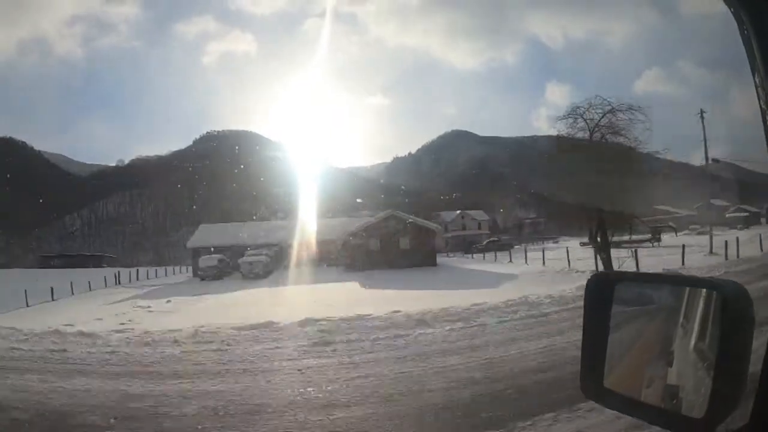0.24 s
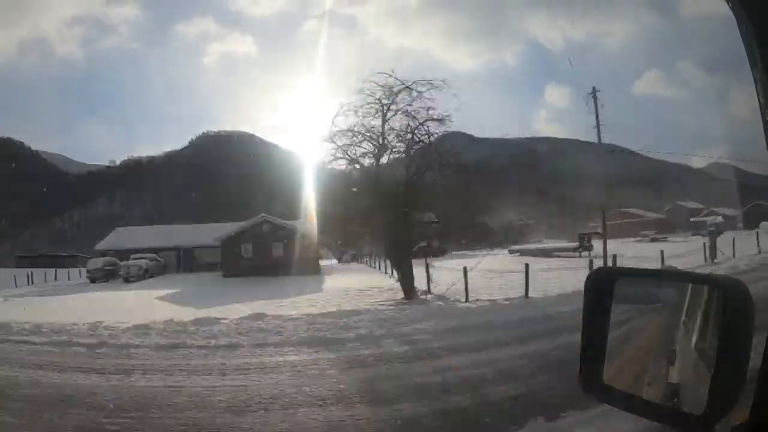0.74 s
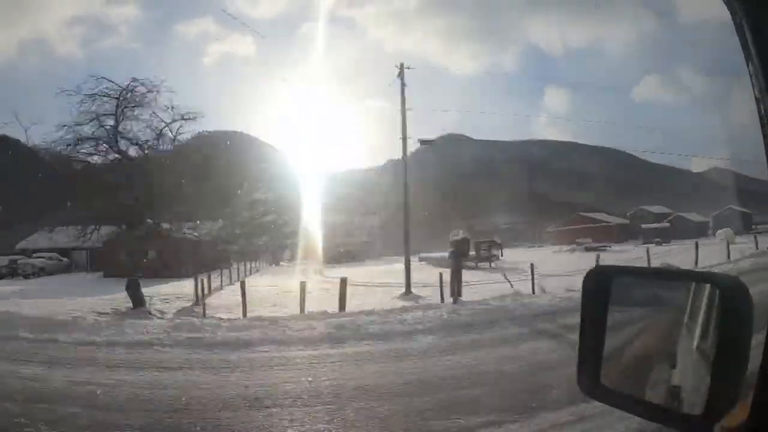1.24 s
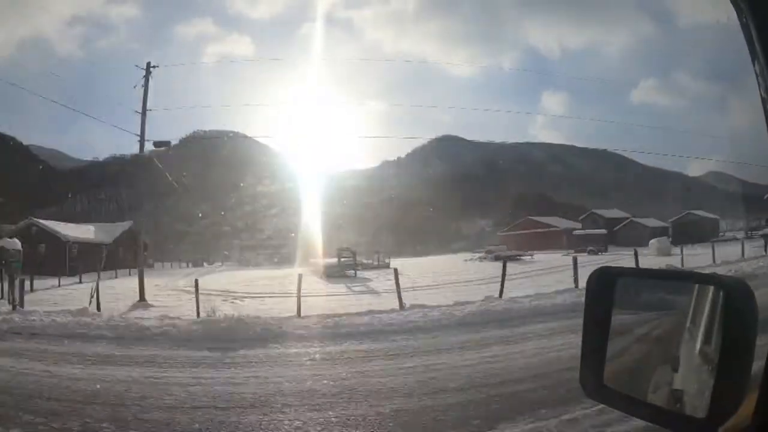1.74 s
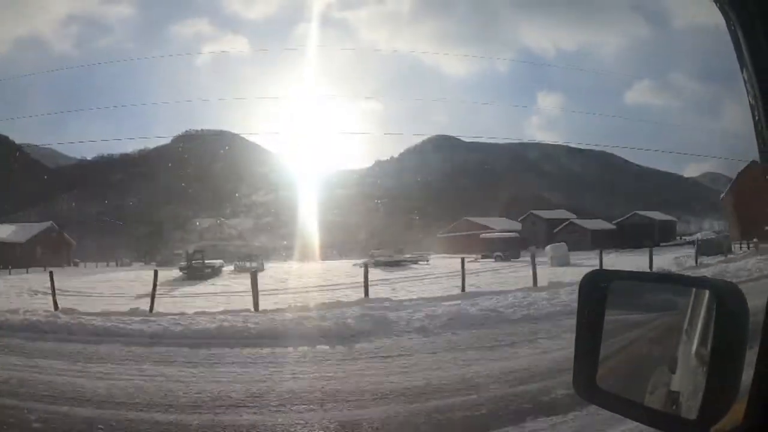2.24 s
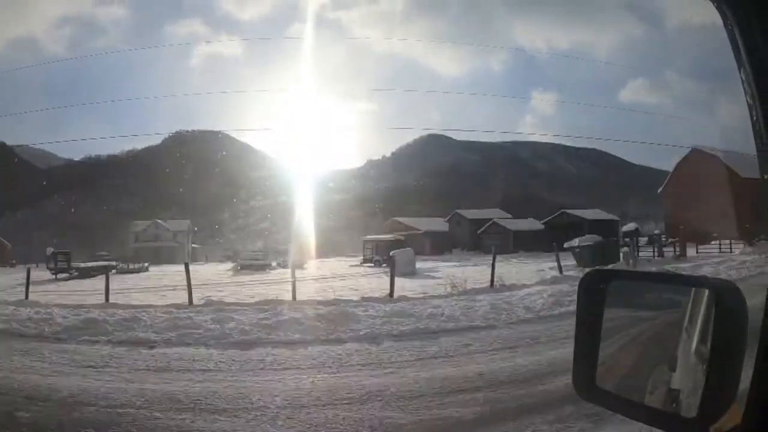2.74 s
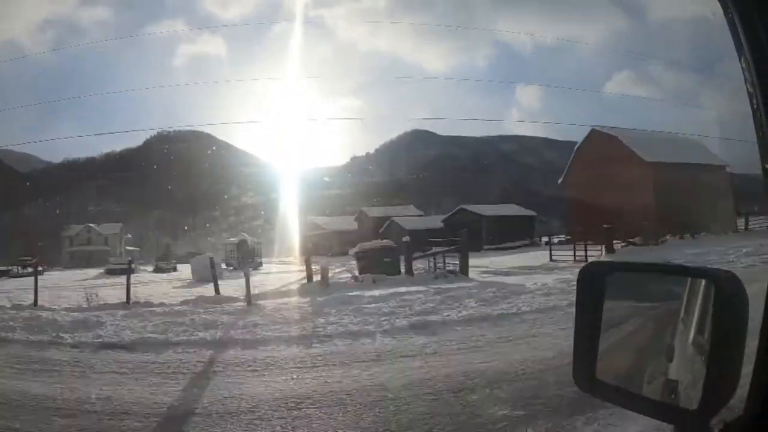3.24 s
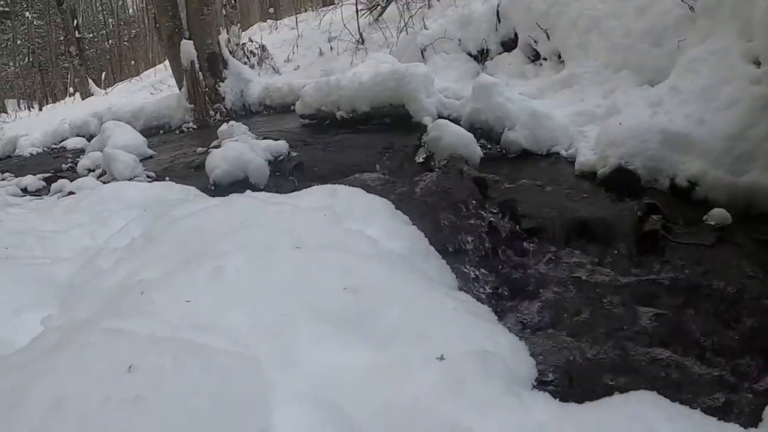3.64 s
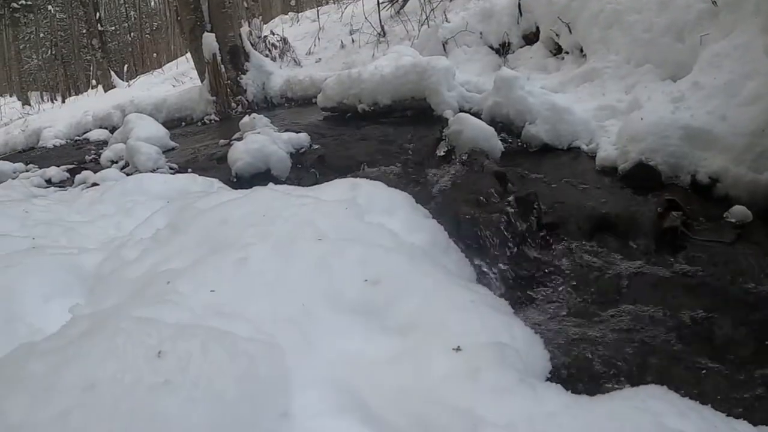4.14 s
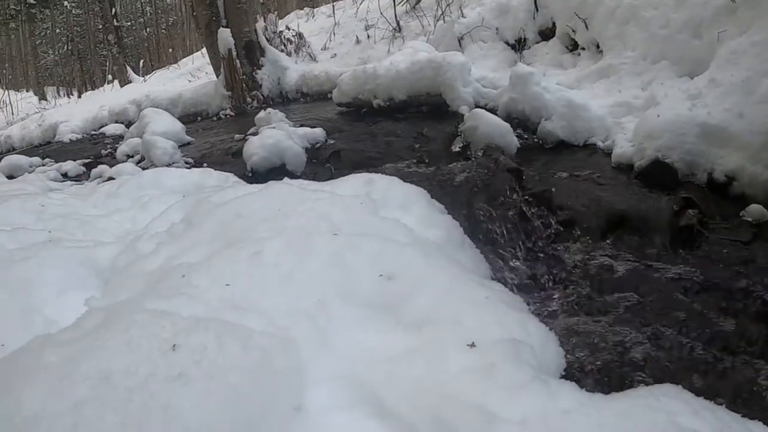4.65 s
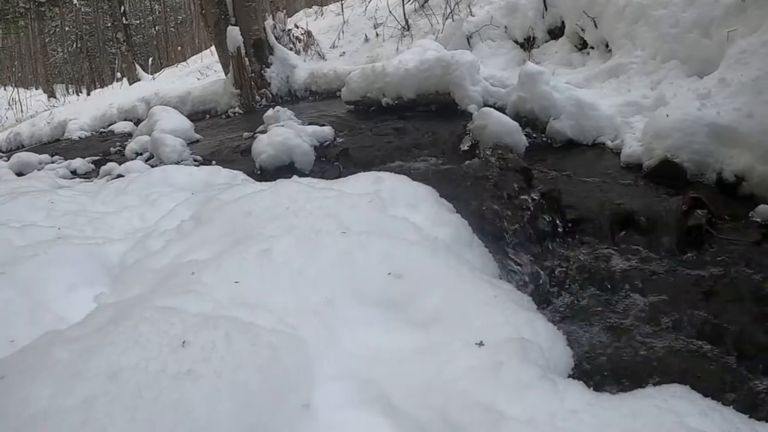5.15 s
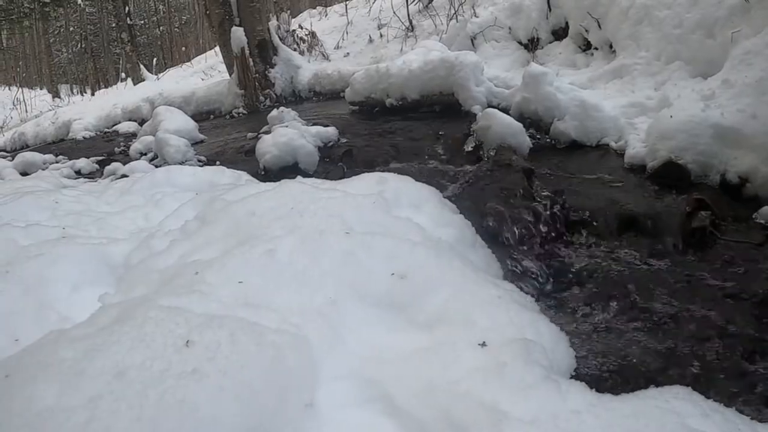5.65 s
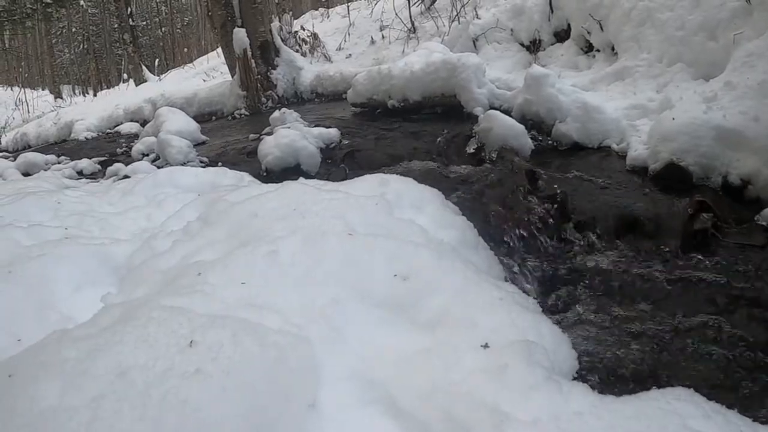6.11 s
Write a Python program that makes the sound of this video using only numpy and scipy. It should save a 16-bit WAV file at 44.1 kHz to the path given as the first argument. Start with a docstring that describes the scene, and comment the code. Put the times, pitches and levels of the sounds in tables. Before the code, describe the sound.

An off-road vehicle booms and hums along a snowy road, heard from inside, before giving way to a bubbling, rushing creek.

```python
"""Inside an off-road vehicle on a packed-snow road, then beside a small creek between snowbanks.
Bumps shake the body and the cabin air into a deep boom. The tyres roar and hum, slush hisses,
loose trim rattles and squeaks, and a few knock-like peaks stand out. A quick fade leads to the
creek rushing over rocks, a wash of noise full of ringing air bubbles. Another returns to the cabin."""
import sys
import numpy as np
from scipy import signal
from scipy.fft import rfft, irfft
from scipy.io import wavfile
from scipy.ndimage import uniform_filter1d

SR = 44100
rng = np.random.default_rng(int(sys.argv[2]) if len(sys.argv) > 2 else 0)


def generate_wav(signal):
    """Clip the signal to [-1, 1] and save it as 16-bit WAV at the path in sys.argv[1]."""
    frames = np.transpose(np.atleast_2d(signal))
    scaled = np.clip(frames, -1, 1) * 32767
    pcm = np.round(scaled).astype(np.int16)
    wavfile.write(sys.argv[1], SR, pcm)


N = 281269
T, HZ = np.arange(N) / SR, np.fft.rfftfreq(N, 1 / SR)
CREEK_START_S, CREEK_END_S = 3.343, 6.278

# Pitches that the cabin panels boost or weaken in roar and hiss: (pitch [Hz], width [Hz], gain [dB])
PANELS = [(128, 22, 2), (136.4, 8, -2.5), (149, 20, 1.5), (161, 11, -2.5), (195, 22, -0.5), (255, 26, 3),
          (340, 44, 5.5), (735, 100, 4.5), (833, 79, -8), (1960, 340, -3.5)]


def cabin():
    """Everything heard in the vehicle; boom, hum, knocks and squeaks reach both ears."""
    # How the two ears differ: (pitch [Hz], likeness [0-1], left lead [radians], left over right [dB])
    cabin_ears = [(30, .999, -.08, 1.5), (70, 1, -.06, .4), (146, .998, -.03, .2), (250, .99, -.11, .25),
                  (330, .98, -.14, -.5), (434, .9, -.11, -.3), (570, .92, -.01, 1.1), (750, .9, -.27, 2.3),
                  (1290, .75, -.3, 2.2), (1690, .73, -.6, 1.6), (2220, .67, -.85, 2.2),
                  (2900, .61, -1.04, 1.9), (3800, .38, -.9, 2.8), (5000, .18, -.9, .6),
                  (9000, .05, -.9, 1.)]
    pair = tyre_roar() + slush_hiss() + gain_of(-74) * trim_rattle(per_s=160, spread_db=2)
    faint_whine = gain_of(-103) * resonance([(11700, 60, 0)], steadiness=0.5)
    pair[0] += body_boom() + tyre_hum() + brief_knocks() + trim_squeaks() + faint_whine
    return stereo(pair, cabin_ears)


def body_boom():
    """Road bumps keep the sprung body and the cabin air ringing at their own low pitches."""
    # Natural tones of the body on its springs: (pitch [Hz], width [Hz], level [dB])
    body_tones = [(21.87, 6.7, -0.5), (32.8, 9.9, -3.5), (41.5, 7.5, -6.5)]
    # Natural tones of the cabin air: (pitch [Hz], width [Hz], level [dB])
    air_tones = [(53, 9, 0.5), (63.9, 10, -2.5), (79.5, 13, -5), (88.9, 11, -10.5)]
    # How hard the road shakes the body: (time [s], level [dB])
    shake_levels = [(0, -33.5), (.12, -37), (.23, -26.5), (.38, -22.5), (.46, -34), (.64, -24), (.86, -31),
                    (1.14, -23.5), (1.34, -36.5), (1.4, -19.5), (1.59, -25), (1.69, -31), (2.25, -25.5),
                    (2.53, -31), (2.65, -27), (2.83, -37), (2.87, -22.5), (3., -25), (3.27, -37.5),
                    (6.3, -37)]
    # How hard the cabin air booms: (time [s], level [dB])
    boom_levels = [(0, -42.5), (.12, -28), (.3, -36.5), (.44, -27.5), (.64, -30), (1.26, -30),
                   (1.34, -33.5), (1.55, -26.5), (1.95, -32), (2.4, -29), (2.8, -30.5), (3.25, -29.5),
                   (6.3, -34)]
    body = gain_of(curve(shake_levels, smooth_s=0.027)) * resonance(body_tones, steadiness=0.76)
    air = gain_of(curve(boom_levels, smooth_s=0.031)) * resonance(air_tones, steadiness=0.69)
    return limit_boom(body + air, limit_db=-19.5, strength=1.16)


def limit_boom(boom, limit_db, strength):
    """The loudest swells of the low boom are held down to a steady level."""
    boom_db = 20 * np.log10(abs(signal.hilbert(boom)) + 1e-9)
    excess_db = uniform_filter1d(np.maximum(boom_db - limit_db, 0), round(0.02 * SR))
    return boom / gain_of(strength * excess_db)


def tyre_roar():
    """Tyres rolling on snow make a low noise that slowly eases and is softer after the creek."""
    # Tone colour of the roar: (pitch [Hz], level [dB])
    roar_spectrum = [(40, -35.5), (90, -4), (130, 0.5), (200, -10.5), (400, -19), (800, -22.5), (1200, -35),
                     (2000, -62), (14000, -120)]
    level_db = np.where(T < CREEK_END_S, -37 - 0.44 * T, -41.5) + rough_start(extra_db=2.22)
    level_db += wander(depth_db=1.06, fastest_hz=3.5)
    noise = patchy_noise(patchy_db=1, flicker_db=-0.07, patch_bands=3, patch_frames=20)
    return gain_of(level_db) * coloured(noise, at_each_pitch(roar_spectrum) + panel_gain_db())


def tyre_hum():
    """The air inside the loaded tyres rings at two close pitches."""
    # Natural tones of that air: (pitch [Hz], width [Hz], level [dB])
    tyre_tones = [(229.5, 18, -4), (252.1, 15, 4)]
    level_db = -53 - 0.3 * np.minimum(T, CREEK_START_S) + rough_start(extra_db=5.1)
    level_db += wander(depth_db=2, fastest_hz=4)
    return gain_of(level_db) * resonance(tyre_tones, steadiness=0.16)


def rough_start(extra_db, lasts_s=0.3):
    """The first stretch of road is coarser, which adds some decibels."""
    return extra_db / (1 + (T / lasts_s) ** 6)


def slush_hiss():
    """Slush under the tyres makes a hiss that swells and eases."""
    # Tone colour of the hiss: (pitch [Hz], level [dB])
    hiss_spectrum = [(500, -32), (900, -0.5), (1200, -7), (2000, -13), (3000, -19.5), (4000, -23),
                     (5000, -26), (6000, -30.5), (7500, -31.5), (9000, -41), (10000, -50), (12500, -51),
                     (14000, -66)]
    # How loud the slush is: (time [s], level [dB])
    slush_levels = [(0, -58.5), (.4, -55), (.6, -55.5), (.72, -54.5), (.85, -56), (1.1, -56.5),
                    (1.27, -56.5), (1.45, -57.5), (1.65, -59.5), (1.8, -58.5), (2.6, -60.5), (2.9, -59.5),
                    (6.3, -56)]
    noise = patchy_noise(patchy_db=0.8, flicker_db=0.7, patch_bands=10, patch_frames=14)
    hiss = coloured(noise, at_each_pitch(hiss_spectrum) + panel_gain_db())
    return gain_of(curve(slush_levels, smooth_s=0.04)) * hiss


def creek():
    """Water rushing over rocks, with gurgles and single gulps on top."""
    # How the two ears differ: (pitch [Hz], likeness [0-1], left lead [radians], left over right [dB])
    creek_ears = [(30, .9, .15, 3.3), (64, .97, 0, 3.3), (110, .99, -.07, 2.5), (190, .99, -.31, 1.4),
                  (330, .99, -.4, .6), (570, .99, -.56, -.6), (750, .98, -.58, -.9), (1290, .96, -.74, -.4),
                  (2220, .91, -.99, .8), (2900, .89, -1.11, 1.6), (3800, .83, -1.35, 2.7),
                  (5000, .66, -2.07, 4.2), (6600, .63, -3.01, 2.3), (8650, .59, -3.16, 1.),
                  (11300, .33, -3.3, -.8)]
    pair = water_rush()
    pair[0] += gain_of(-49) * gurgles(per_s=90) + gulps()
    return stereo(pair, creek_ears)


def water_rush():
    """Froth in a smooth wash of noise; its low rumble rises and falls apart from the rest."""
    # Tone colour of the water: (pitch [Hz], level [dB])
    rush_spectrum = [(15, -23), (30, -0.5), (65, -1.5), (200, -4.5), (270, -3), (750, -2), (830, -3.5),
                     (1200, -2), (2000, -6), (3000, -10), (4000, -13), (5000, -17.5), (6000, -21),
                     (7500, -21), (9000, -26), (11000, -36), (13000, -35.5), (14300, -55)]
    # How the main rush swells and eases: (time [s], level [dB])
    flow_levels = [(3.4, -37.5), (3.85, -37), (4.1, -36.5), (4.45, -37), (4.62, -37.5), (4.72, -37.5),
                   (4.85, -36), (5., -37), (5.2, -37), (5.45, -37), (5.6, -37), (5.88, -37.5), (6.2, -36.5)]
    # Level of the creek's low rumble, which rises and falls at random: (time [s], level [dB])
    low_rumble_levels = [(3.4, -56), (3.75, -51), (4.1, -48), (4.25, -51.5), (4.7, -47), (5., -52),
                         (5.4, -49), (5.6, -51), (5.76, -49), (6.2, -53.5)]
    rush_db = curve(flow_levels, smooth_s=0.05) + wander(depth_db=0.9, fastest_hz=4.9)
    rumble_db = curve(low_rumble_levels, smooth_s=0.043) + wander(depth_db=2, fastest_hz=6.4)
    spray_db = -23 + wander(depth_db=0.06, fastest_hz=6.1)  # relative to the rush
    wash = gain_of(-0.5) * patchy_noise(patchy_db=1.13, flicker_db=0.76, patch_bands=8, patch_frames=5)
    water = rfft(coloured(wash + gain_of(-6.5) * froth(per_s=4000), at_each_pitch(rush_spectrum)))
    low = 1 / (1 + (HZ / 150) ** 4)
    high = 1 / (1 + (5500 / (HZ + 1)) ** 8)
    rumble, middle, spray = (evened(irfft(water * band, N)) for band in (low, 1 - low - high, high))
    return gain_of(rush_db) * (middle + gain_of(spray_db) * spray) + gain_of(rumble_db) * rumble


def froth(per_s):
    """Thousands of bubbles of all pitches ring at random, a few of them loudly."""
    pitches, out = np.geomspace(70, 14000, num=24), np.zeros((2, N))
    for hz in pitches:
        share = np.sqrt(hz) / np.sqrt(pitches).sum()
        spread_db = 2.5 + 0.9 * np.log2(hz / 1000)  # fine droplets differ more in size
        births = random_kicks((2, N), per_s * share, spread_db, cap=5)
        ring = bubble(hz, cycles=2.22, glide=0.045)
        out += np.sqrt(hz) * evened(signal.oaconvolve(births, ring[None], axes=1)[:, :N])
    return evened(out)


def gulps():
    """Single loud bubbles stand out of the rush; high ones ring for more cycles."""
    # The loudest bubbles: (time [s], peak level [dB], pitch [Hz])
    loud_bubbles = [(3.502, -28, 3250), (3.639, -35, 475), (3.645, -34, 360), (3.692, -35, 720),
                    (3.765, -31, 600), (3.772, -35.5, 423), (3.869, -39, 4590), (3.936, -31, 470),
                    (3.999, -32, 3257), (4.05, -38, 95), (4.116, -34, 1290), (4.163, -42, 4160),
                    (4.231, -34, 800), (4.273, -36, 4170), (4.335, -36, 721), (4.367, -35, 1630),
                    (4.452, -38, 147), (4.46, -34, 4230), (4.489, -45, 372), (4.517, -36, 350),
                    (4.539, -31, 3400), (4.576, -33, 3470), (4.675, -35.5, 104), (4.715, -38, 326),
                    (4.731, -29, 1290), (4.737, -37, 1150), (4.74, -28, 720), (4.743, -36, 500),
                    (4.749, -39, 2300), (4.752, -35, 1730), (4.772, -28.5, 2660), (4.834, -33.5, 330),
                    (4.847, -30.5, 362), (4.878, -33, 1140), (5.045, -32, 3500), (5.105, -34, 2100),
                    (5.118, -35, 445), (5.193, -32.5, 310), (5.206, -32.5, 3800), (5.328, -33, 3210),
                    (5.333, -39, 480), (5.363, -34, 268), (5.392, -32, 3220), (5.473, -29.5, 2300),
                    (5.512, -33, 730), (5.569, -33, 2550), (5.63, -32.5, 270), (5.697, -34, 1680),
                    (5.79, -32, 2100), (5.811, -37, 4130), (5.86, -38, 330), (5.903, -31, 302),
                    (5.94, -40, 485), (5.996, -33, 2340), (6.162, -34, 283)]
    out = np.zeros(N)
    for peak_s, peak_db, hz in loud_bubbles:
        ring = bubble(hz, cycles=1.1 + 0.38 * np.log2(hz / 100), glide=0.03)
        start = round(peak_s * SR) - abs(ring).argmax()
        out[start:start + len(ring)] += gain_of(peak_db) * ring / abs(ring).max()
    return out


def gurgles(per_s):
    """Scattered low bubbles that ring longer than the froth."""
    pitches, out = np.geomspace(202.7, 1505, num=12), np.zeros(N)
    for hz in pitches:
        births = random_kicks(N, per_s / len(pitches), spread_db=3, cap=3)
        out += evened(signal.oaconvolve(births, bubble(hz, cycles=2.5, glide=0.12))[:N])
    return out / np.sqrt(len(pitches))


def bubble(hz, cycles, glide):
    """Trapped air rings: it swells for `cycles` vibrations, then dies away, its pitch rising."""
    age = np.arange(round(8 * cycles * SR / hz)) * hz / (cycles * SR)  # 1 at the loudest point
    turns = cycles * (age + glide * (age ** 2 / 2 - age))
    return age ** 2 * np.exp(-2 * age) * np.sin(2 * np.pi * turns)


def brief_knocks():
    """Brief knock-like peaks near 700 Hz stand out of the road noise."""
    # The peaks: (time [s], peak level [dB])
    knocks = [(0.646, -38.5), (1.721, -35.5), (1.992, -39), (2.878, -43.5)]
    # Tones heard in each peak: (pitch [Hz], level [dB], time to fall 60 dB [s])
    knock_tones = [(706, 1, 0.075), (592, -4, .04), (1020, -6.5, .04)]
    ring = np.convolve(ringing(knock_tones), np.hanning(SR // 2000))  # softens the start
    spikes = np.zeros(N)
    for start_s, peak_db in knocks:
        spikes[round(start_s * SR)] = gain_of(peak_db)
    return signal.oaconvolve(spikes, ring / abs(ring).max())[:N]


def trim_squeaks(length_s=0.045, wobble=0.03):
    """Rubbing trim gives short soft tones with a trembling pitch."""
    # The squeaks: (time [s], peak level [dB], pitch [Hz])
    squeaks = [(0.395, -60, 2260), (0.72, -64, 3110), (0.81, -67, 2450), (1.235, -61, 2470),
               (1.39, -60, 2960), (1.51, -64, 2190), (1.62, -63, 2420), (1.69, -66, 2210), (2.9, -66, 2150),
               (3.18, -62, 2420)]
    out, t = np.zeros(N), np.arange(round(length_s * SR)) / SR
    swell = np.sin(np.pi * (t / length_s) ** 0.55) ** 2
    for start_s, peak_db, hz in squeaks:
        tremble = evened(uniform_filter1d(rng.standard_normal(4096), size=150))[:len(t)]
        turns = np.cumsum(hz * (1 + wobble * tremble)) / SR
        start = round(start_s * SR)
        out[start:start + len(t)] += gain_of(peak_db) * swell * np.sin(2 * np.pi * turns)
    return out


def trim_rattle(per_s, spread_db):
    """Each loose piece of trim ticks at random and rings at its own pitch."""
    # One tone for each piece: (pitch [Hz], level [dB], time to fall 60 dB [s])
    trim_tones = [(2214, 0, 0.038), (2450, 1, 0.03), (3110, -4.5, 0.039), (3565, -10, .05)]
    out = np.zeros((2, N))
    for tone in trim_tones:
        ticks = random_kicks((2, N), per_s, spread_db, cap=4)
        out += signal.oaconvolve(ticks, ringing([tone])[None], axes=1)[:, :N]
    return evened(out)


def resonance(tones, steadiness):
    """Random shaking keeps tones ringing; big swings are damped more, which steadies the level."""
    out = np.zeros(N)
    for hz, width_hz, db in tones:
        narrow_noise = irfft(rfft(rng.standard_normal(N)) * hump(hz, width_hz), N)
        swing = signal.hilbert(evened(narrow_noise))
        out += gain_of(db) * evened(swing.real / (abs(swing) + 0.19) ** steadiness)
    return evened(out)


def ringing(tones):
    """Tones that start together and die away."""
    t = np.arange(SR // 10) / SR
    return sum(gain_of(db - 60 * t / fall_s) * np.sin(2 * np.pi * hz * t) for hz, db, fall_s in tones)


def panel_gain_db():
    """How much the cabin panels boost or weaken each pitch."""
    return sum(db * hump(hz, width_hz) for hz, width_hz, db in PANELS)


def hump(hz, width_hz):
    """How strongly a ringing part answers each pitch: 1 at its own, less on either side."""
    return 1 / (1 + (2 * (HZ - hz) / width_hz) ** 2)


def random_kicks(shape, per_s, spread_db, cap):
    """Spikes at random moments, mostly small; the largest are cap * spread_db decibels stronger."""
    size = gain_of(spread_db * np.minimum(rng.exponential(1, shape), cap))
    return size * (rng.random(shape) < per_s / SR)


def patchy_noise(patchy_db, flicker_db, patch_bands, patch_frames):
    """Two separate white noises that share louder and softer patches and a quick flicker."""
    bands, frames = 257, N // 128 + 5  # a band is 86 Hz wide; frames are 2.9 ms apart
    patches = uniform_filter1d(rng.standard_normal((bands, frames)), patch_bands, axis=0)
    patches = evened(uniform_filter1d(patches, patch_frames, axis=1))
    flicker = evened(uniform_filter1d(rng.standard_normal(frames), size=4))
    spectra = rng.standard_normal((2, bands, frames)) + 1j * rng.standard_normal((2, bands, frames))
    spectra *= gain_of(patchy_db * patches + flicker_db * flicker)
    return evened(signal.istft(spectra, nperseg=512, noverlap=384)[1][:, :N])


def stereo(pair, ears):
    """The left ear hears pair[0]; the right hears a blend of both rows, shifted in phase."""
    shared, separate = rfft(pair)
    likeness, lead, balance_db = (at_each_pitch(np.array(ears)[:, [0, k]]) for k in (1, 2, 3))
    right = (likeness * shared + np.sqrt(1 - likeness ** 2) * separate) * np.exp(-1j * lead)
    tilt = gain_of(balance_db / 2)
    return irfft(np.array([shared * tilt, right / tilt]), N)


def wander(depth_db, fastest_hz):
    """A slow random rise and fall in level, in dB."""
    t, rates_hz = T[::256], np.geomspace(0.6, fastest_hz, num=16)
    swell = sum(np.sin(2 * np.pi * (hz * t + rng.random())) / np.sqrt(hz) for hz in rates_hz)
    return depth_db * evened(np.interp(T, t, swell))


def curve(rows, smooth_s):
    """Joins (time, level) points into a line with rounded corners."""
    return uniform_filter1d(np.interp(T, *np.transpose(rows)), round(smooth_s * SR))


def at_each_pitch(points):
    """Joins (pitch, value) points with straight lines on an octave scale."""
    hz, value = np.transpose(points)
    return np.interp(np.log(HZ + 1), np.log(hz + 1), value)


def coloured(x, db):
    """Turns each pitch of x up or down by db, then sets the average power to 1."""
    return evened(irfft(rfft(x) * gain_of(db), N))


def evened(x):
    """Scales x to an average power of 1."""
    return x / np.sqrt(np.mean(x ** 2) + 1e-20)


def gain_of(db):
    """Turns decibels into a factor to multiply by."""
    return 10 ** (np.asarray(db) / 20)


def scene(fade_s=0.095):
    """Cabin, creek, cabin again, with a quick fade through silence at each change."""
    to_change_s = np.minimum(abs(T - CREEK_START_S), abs(T - CREEK_END_S))
    fade = np.minimum(to_change_s / fade_s, 1)
    outdoors = (T > CREEK_START_S) & (T < CREEK_END_S)
    return fade * np.where(outdoors, creek(), cabin())


def record(dry, top_hz=14500):
    """Takes away the highest treble."""
    low_pass = signal.firwin(511, top_hz, window=("kaiser", 9), fs=SR)
    return signal.oaconvolve(dry, low_pass[None], "same")


dry = scene()
out = record(dry)
generate_wav(out)
```